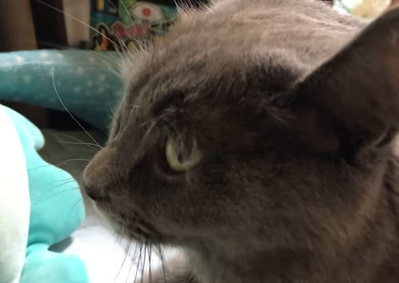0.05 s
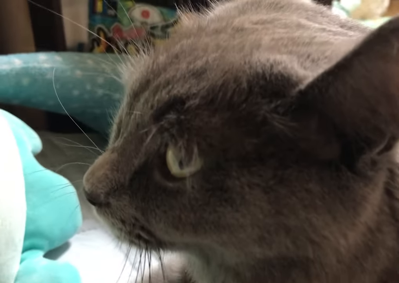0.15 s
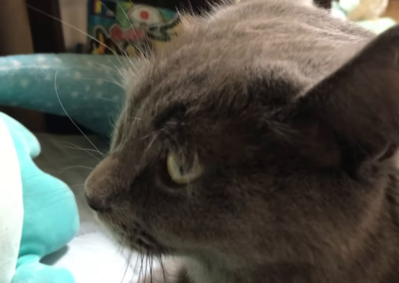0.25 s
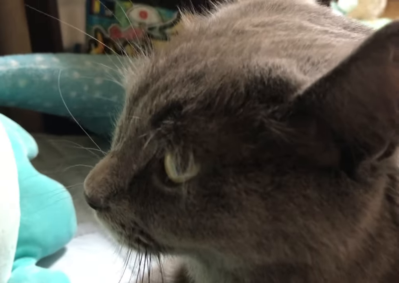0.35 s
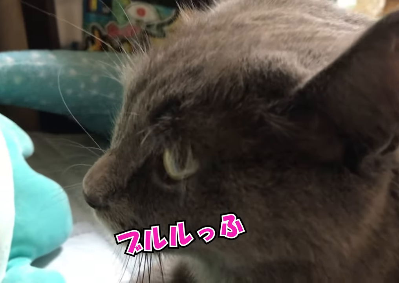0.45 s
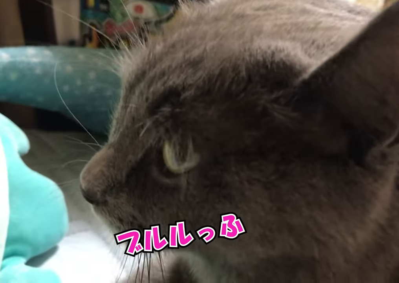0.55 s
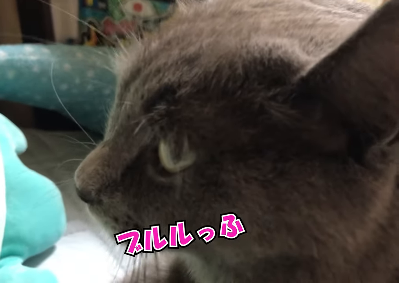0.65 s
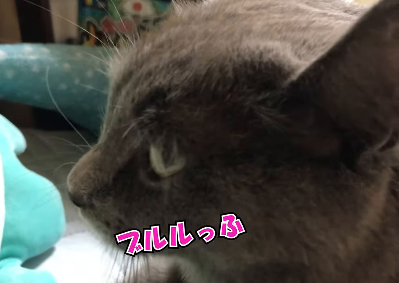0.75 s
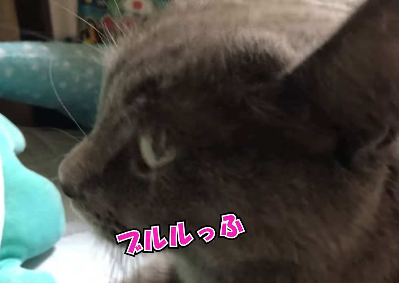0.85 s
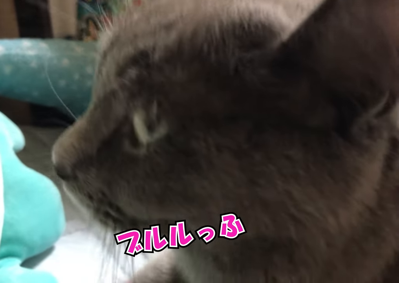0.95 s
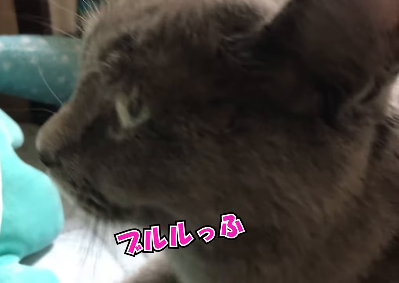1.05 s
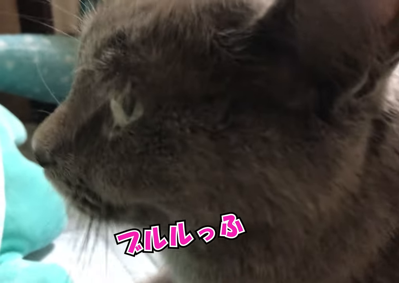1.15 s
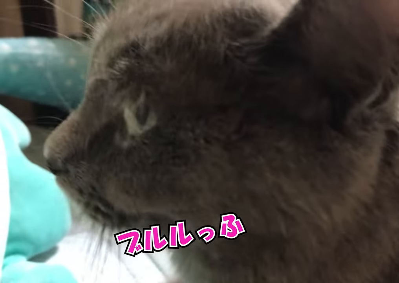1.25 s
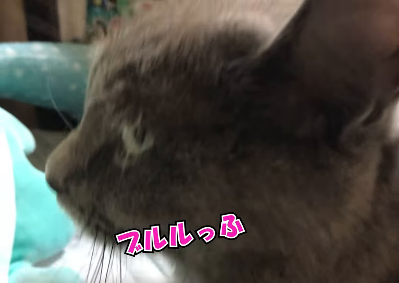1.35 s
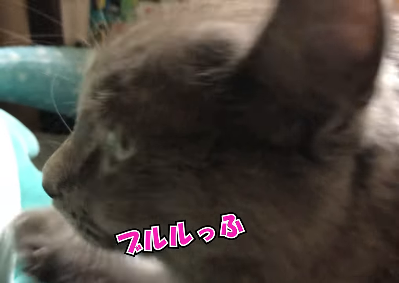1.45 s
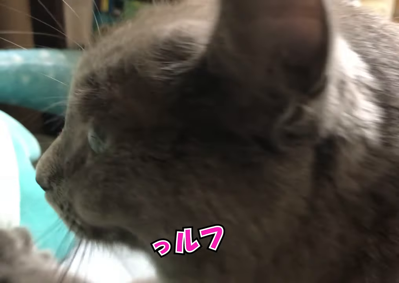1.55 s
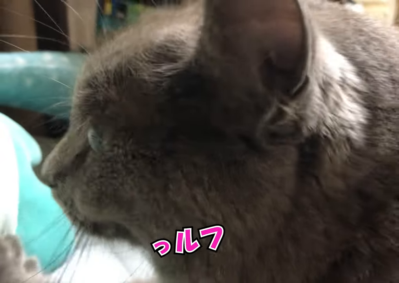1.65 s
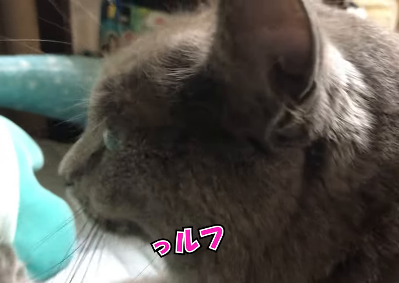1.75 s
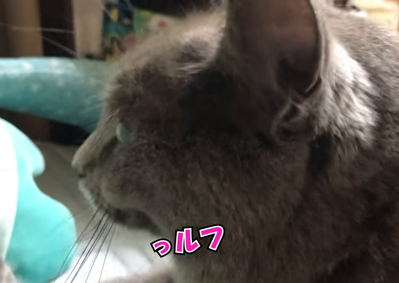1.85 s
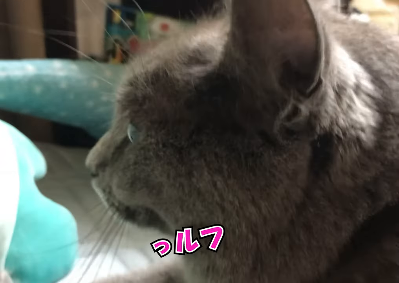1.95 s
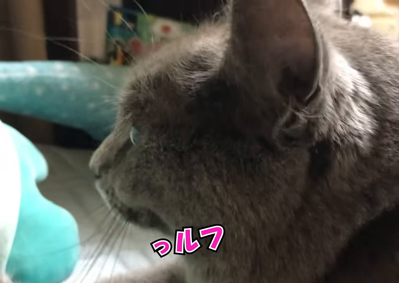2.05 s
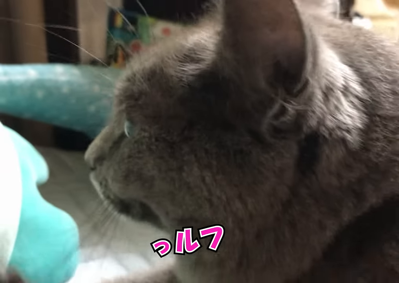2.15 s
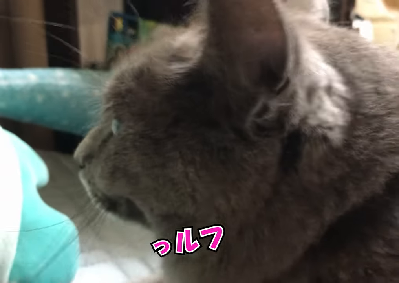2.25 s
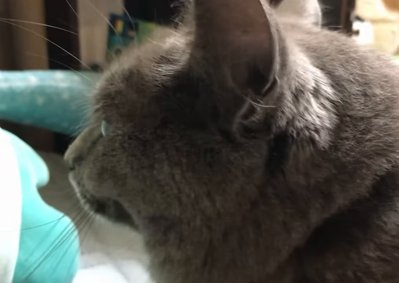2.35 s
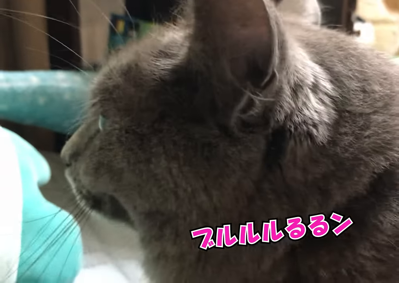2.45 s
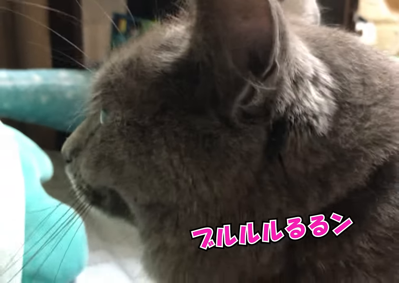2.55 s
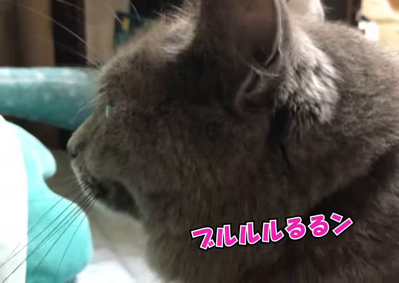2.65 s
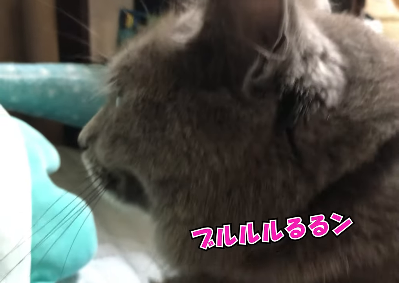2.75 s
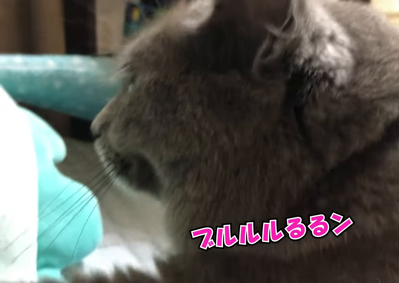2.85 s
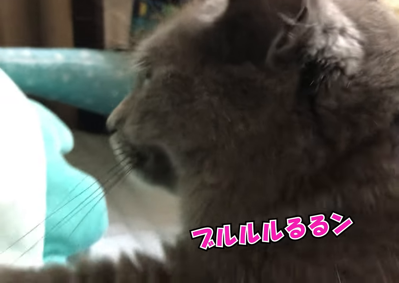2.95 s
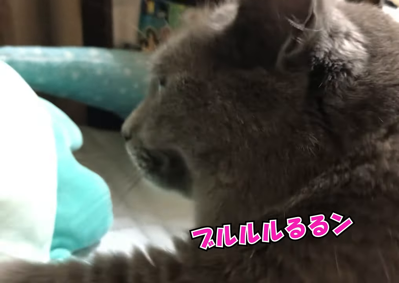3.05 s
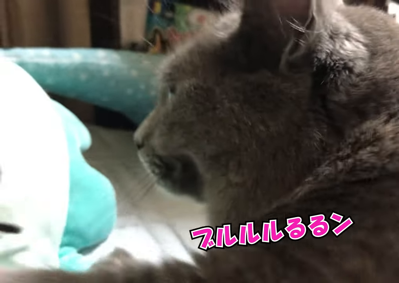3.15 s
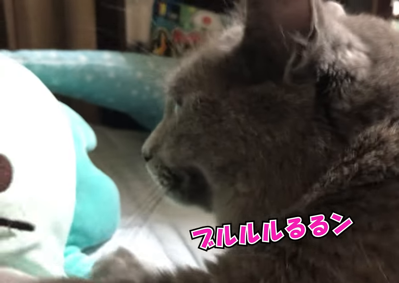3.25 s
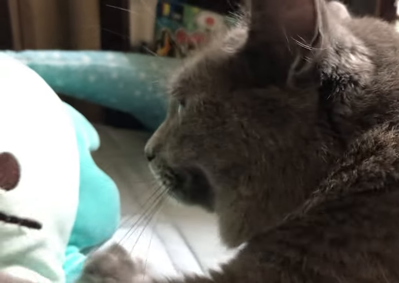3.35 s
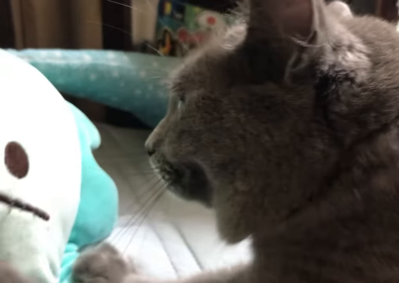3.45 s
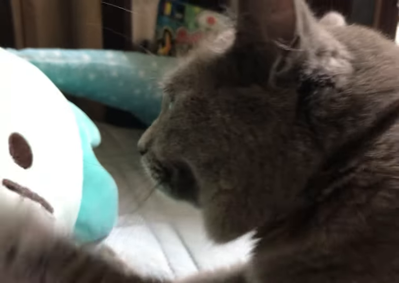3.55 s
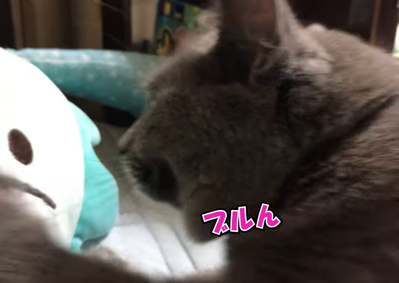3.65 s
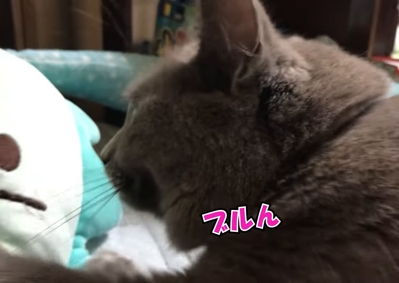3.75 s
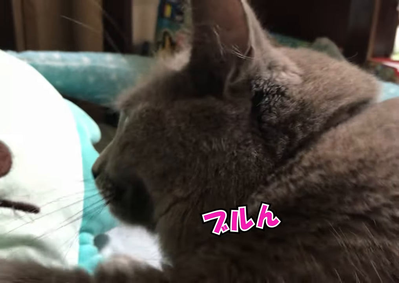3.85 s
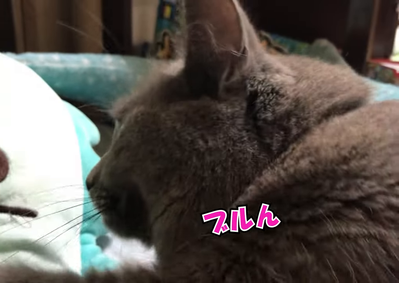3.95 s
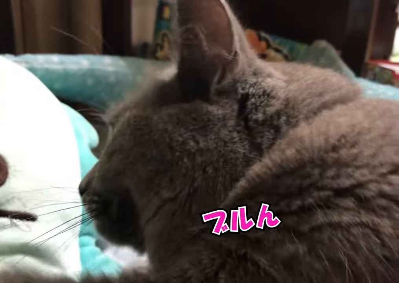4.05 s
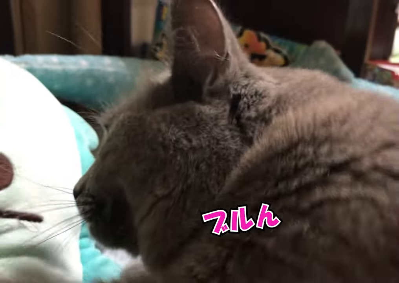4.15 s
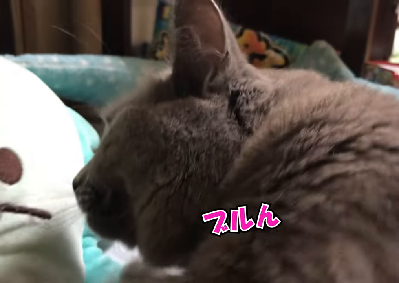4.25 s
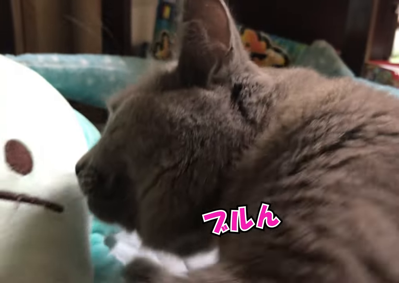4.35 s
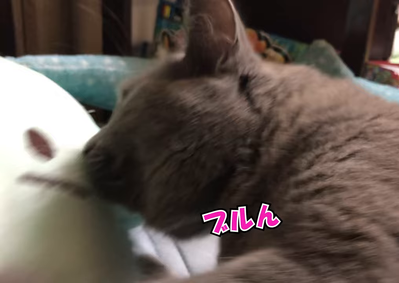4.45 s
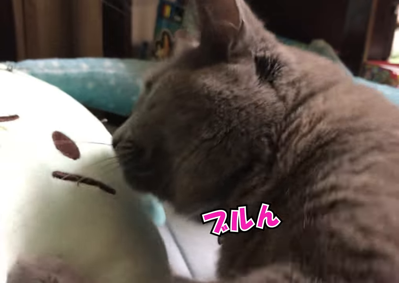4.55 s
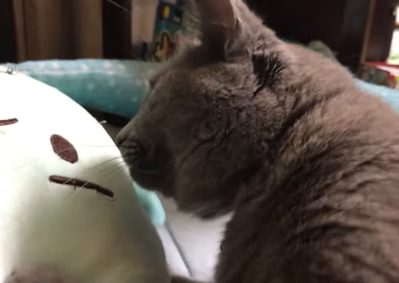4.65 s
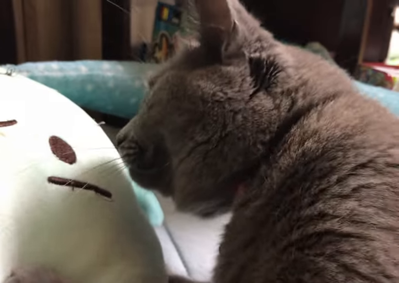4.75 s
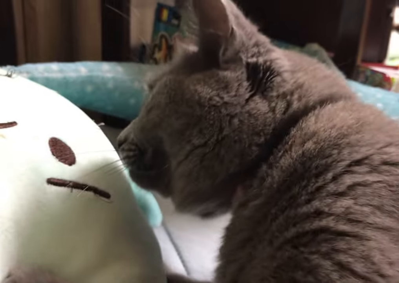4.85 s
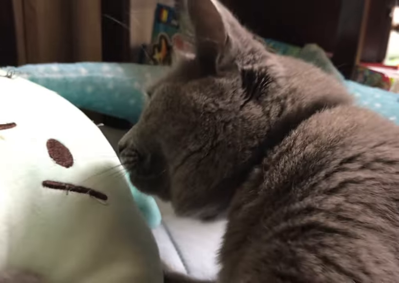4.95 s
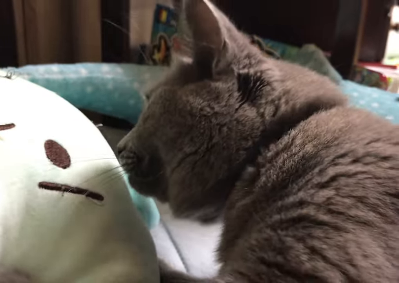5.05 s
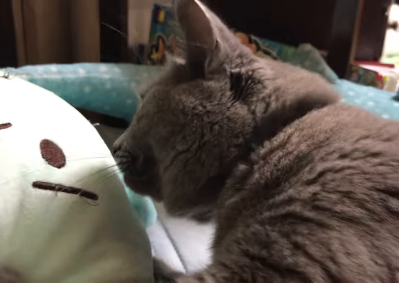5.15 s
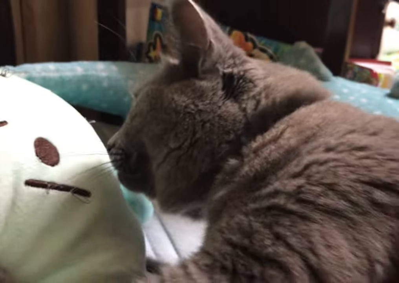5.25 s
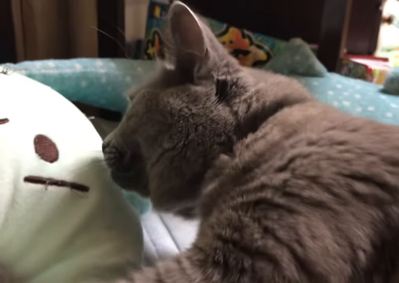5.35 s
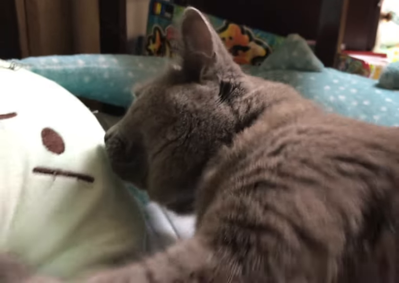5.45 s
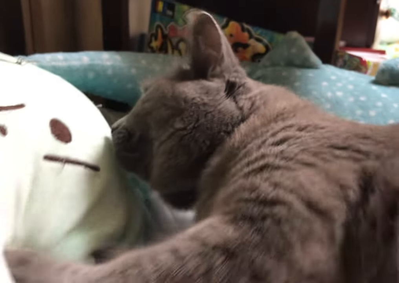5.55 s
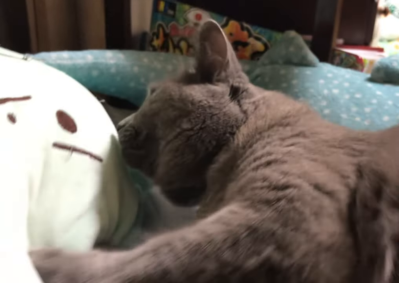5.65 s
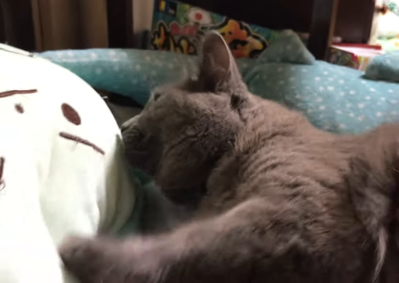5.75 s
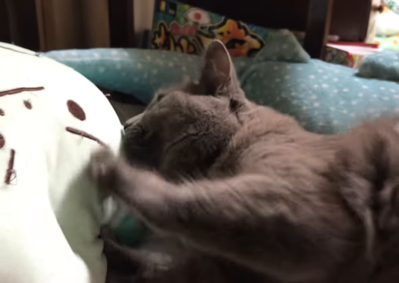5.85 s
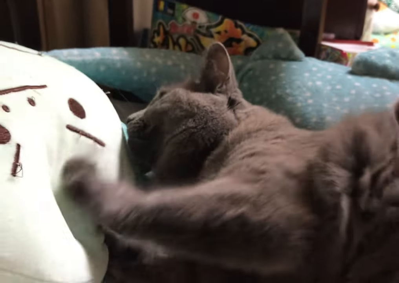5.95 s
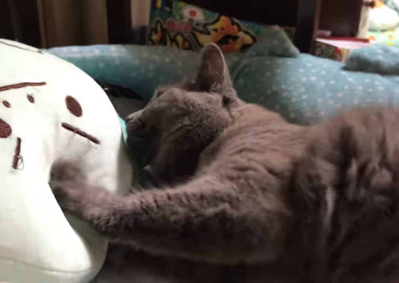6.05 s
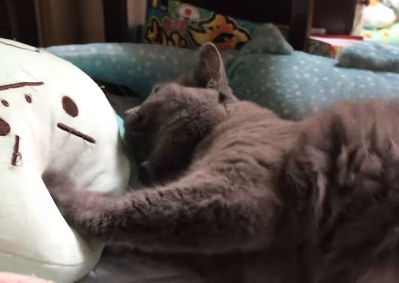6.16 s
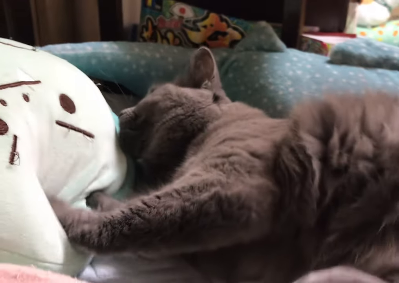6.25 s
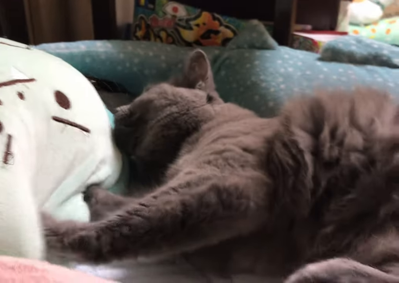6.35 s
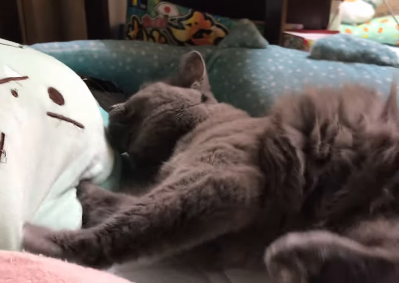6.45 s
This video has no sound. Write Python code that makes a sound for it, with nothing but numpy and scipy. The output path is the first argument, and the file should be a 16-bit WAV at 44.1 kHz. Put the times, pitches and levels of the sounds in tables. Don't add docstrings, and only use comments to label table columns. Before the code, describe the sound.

An intimate, dry indoor close-up of a purring cat: a low rattling flutter with breathy hiss, rising and falling with each breath. A dull paw knock with a claw snap comes first, then loud purring, a crisp metallic tick, several soft bedding thuds and another strong purr. Later breaths are quieter and broken up, background noise suppressed, ending almost silent.

```python
import sys
import numpy as np
from scipy import signal
from scipy.fft import rfft, irfft, next_fast_len
from scipy.io import wavfile
from scipy.ndimage import uniform_filter1d

SR = 44100
rng = np.random.default_rng(int(sys.argv[2]) if len(sys.argv) > 2 else 0)


def level_to_linear(level):
    exponent = np.asarray(level, float) / 20
    return 10 ** exponent


def transcribe(u):
    v = np.clip(np.atleast_2d(u).T, -1, 1)
    q = np.round(v * 32767).astype(np.int16)
    wavfile.write(sys.argv[1], SR, q)


N = 287223

# (frequency [Hz], density [dB per Hz])
ROOM_SPECTRUM = [(12, -34), (30, -8.5), (65, -2.5), (120, -6.5), (200, -6), (300, -14), (400, -19),
                 (650, -19), (885, -22), (1020, -21), (1540, -24.5), (2600, -28), (4580, -29.5),
                 (15600, -35)]
ROOM_DB = -45


def purr():
    # (time [s], pulses so far [count])
    beat = [(0.022, 0), (0.187, 5), (0.543, 15), (1.059, 30), (1.584, 45), (2.464, 70), (2.983, 85),
            (3.321, 95), (3.506, 100), (4.036, 115), (4.394, 125), (4.575, 131), (4.713, 135), (5.056, 145),
            (5.249, 150), (5.431, 155), (6.133, 175), (6.51, 186)]
    # (frequency [Hz], width [Hz], level [dB])
    chest_modes = [(240, 220, 1), (470, 220, -4)]
    throat_modes = [(1005, 330, 3), (1414, 280, -4), (1714, 239, -1.5)]

    t = np.arange(N) / SR
    count = np.interp(t - 0.003, *np.transpose(beat))
    cycle = count.astype(int)
    phase = count % 1
    strength_db, flutter_db = rng.standard_normal((400, 2))[cycle].T
    closes = np.diff(cycle, prepend=cycle[0]) > 0
    claps = evened(closes * level_to_linear(1.5 * strength_db))

    (chest_db, chest_hz, chest_span, throat_db, throat_hz, throat_span,
     nose_db, breath_db, breath_hz, husk) = controls(t)

    swell = 0.18 + np.exp(-(1 - phase) / 0.21) + 0.76 * np.exp(-phase / 0.08)
    air = evened(swell * level_to_linear(1.6 * flutter_db) * rng.standard_normal(N)) * husk

    chest = focus(rings(claps + 0.95 * air, chest_modes), chest_hz, chest_span, skirt_db=13)
    throat = focus(rings(claps + 1.1 * air, throat_modes), throat_hz, throat_span, skirt_db=12)
    nose = evened(resonate(claps + air, hz=2682, width_hz=830))
    hiss = resonate(claps + 3.6 * air, hz=6920, width_hz=4400)
    breath = focus(hiss, breath_hz, np.full(N, 0.22), skirt_db=9)
    breath += 0.9 * evened(resonate(claps + 0.33 * air, hz=10500, width_hz=5000))

    body = level_to_linear(chest_db - 0.83) * chest - level_to_linear(throat_db - 1.57) * throat
    return body + level_to_linear(nose_db - 1.48) * nose + level_to_linear(breath_db - 11.5) * breath


def controls(t):
    # (time [s], effort [dB], mouth: throat against chest [dB], chest ring [Hz])
    breath_1 = [(.41, -56, -34, 305), (.5, -31, -10, 290), (.61, -26.5, -5, 384), (.7, -29.5, -7.5, 309),
                (.8, -30, -9, 283), (.9, -35, -14.5, 276), (.98, -28.5, -14, 345), (1.08, -43.5, -6.5, 225),
                (1.17, -63, 2, 300)]
    breath_2 = [(1.47, -55, -1, 268), (1.58, -48.5, -3, 382), (1.66, -30.5, -6, 382),
                (1.78, -35, -15.5, 440), (1.86, -38.5, -15, 410), (1.93, -41.5, -8.5, 387.8),
                (2.0, -47, -6, 339), (2.1, -51.5, -7.5, 299.5)]
    breath_3 = [(2.46, -68, -14, 335), (2.52, -28.5, -11.5, 310), (2.6, -34, -11, 369.7),
                (2.7, -30.5, -9.5, 310), (2.8, -31, -17, 300), (2.92, -35, -6, 310),
                (3.0, -31.5, -11.5, 305), (3.07, -39.5, -24, 249), (3.19, -51, -14, 248)]
    breath_4 = [(3.6, -52, 1, 303), (3.7, -54.5, -6.5, 400), (3.79, -46.5, -9, 370),
                (3.9, -38.5, -18.5, 335), (3.99, -43.5, -1.5, 350), (4.1, -45, 2, 346),
                (4.19, -38, -7.5, 341.1), (4.29, -46.5, -4, 345), (4.37, -61.5, 0, 330)]
    breath_5 = [(5.21, -62.5, -1, 330), (5.28, -49.5, 4, 384), (5.36, -41, -12.5, 350),
                (5.49, -55, 6.5, 380), (5.6, -44, -2.5, 390), (5.8, -46, 2, 395), (5.9, -49, -1, 434),
                (5.97, -50, 6, 428), (6.07, -54.5, 0, 380)]
    # (chest half spread [octaves], widening [octaves per octave of ring], nose [dB], hiss [dB],
    # air against clap [ratio])
    posture = [(1, 2.8, -49, -52.5, 1.064), (.65, -.3, -57.5, -52, 1.2), (0.82, 0.14, -52.5, -52.5, 1.1),
               (0.38, -1.7, -59.5, -53, 1.484), (0.3383, -.5, -60.5, -50, 1.2)]
    # (start [Hz], end [Hz], half spread at start [octaves], at end [octaves])
    tongue = [(1250, 1190, .36, .33), (1320, 1400, .5, .55), (1260, 1194, 0.56, .2),
              (1340, 1250, 0.77, .75), (1300, 1190, 0.79, .26)]
    # (time [s], half length [s], frequency [Hz])
    pinches = [(1.1, .06, 1358), (1.54, .05, 1078), (1.94, .06, 1711), (3.6, .04, 1711), (5.408, .03, 1078),
               (5.524, .04, 1053)]
    # (time [s], half length [s], extra level [dB], frequency [Hz])
    sniffs = [(.6, 0.11, 5, 6920), (0.713, .03, 5, 5400), (2.587, .05, 5, 5400), (4.195, .03, 7.5, 5400)]
    rest_effort_db, rest_mouth_db, rest_nose_db, rest_hiss_db = -49, -10.5, -55, -60.5
    rest_chest_hz, rest_throat_hz, rest_spread, rest_husk = 255, 1300, 0.46, 0.3
    full_effort_db, full_throat_db = -35, -42

    rows = [np.transpose(b) for b in (breath_1, breath_2, breath_3, breath_4, breath_5)]
    slow = t[::200]

    def contour(rest, column):
        return through(slow, rest, [r[[0, column]] for r in rows])

    def glide(rest, starts, ends):
        curves = [(r[0][[0, -1]], [a, b]) for r, a, b in zip(rows, starts, ends)]
        return through(slow, rest, curves)

    effort_db = contour(rest_effort_db, 1)
    mouth_db = contour(rest_mouth_db, 2)
    chest_hz = contour(rest_chest_hz, 3)
    rests = [rest_spread, 0, rest_nose_db, rest_hiss_db, rest_husk]
    spread, widening, nose_db, hiss_db, husk = (
        glide(rest, held, held) for rest, held in zip(rests, np.transpose(posture)))
    hz_start, hz_end, span_start, span_end = np.transpose(tongue)
    throat_hz = glide(rest_throat_hz, hz_start, hz_end)
    throat_span = glide(rest_spread, span_start, span_end)

    for s, half_s, hz in pinches:
        pinch = bump(slow, s, half_s)
        throat_hz = throat_hz + pinch * (hz - throat_hz)
        throat_span = throat_span + pinch * (0.17 - throat_span)

    breath_db = hiss_db + 0.5 * (effort_db - full_effort_db)
    breath_hz = np.full(len(slow), 5400.0)
    for s, half_s, db, hz in sniffs:
        puff = bump(slow, s, half_s)
        breath_db = breath_db + db * puff
        breath_hz = breath_hz + puff * (hz - breath_hz)

    chest_span = np.maximum(spread + widening * np.log2(chest_hz / 330), 0.2)
    throat_db = effort_db + mouth_db
    nose_db = nose_db + 0.45 * (throat_db - full_throat_db)
    curves = (effort_db, chest_hz, chest_span, throat_db, throat_hz, throat_span,
              nose_db, breath_db, breath_hz, husk)
    return [np.interp(t, slow, curve) for curve in curves]


def through(t, rest, curves):
    turn_s = 0.13
    times = [np.r_[s[0] - turn_s, s, s[-1] + turn_s] for s, _ in curves]
    values = [np.r_[rest, v, rest] for _, v in curves]
    return np.interp(t, np.concatenate(times), np.concatenate(values))


def bump(t, s, half_s):
    return np.exp(-((t - s) / half_s) ** 4)


def rings(x, modes):
    return sum((-1) ** k * level_to_linear(db) * resonate(x, hz, width) for k, (hz, width, db) in enumerate(modes))


def focus(x, centre_hz, spread_octaves, skirt_db):
    hz, t, z = signal.stft(x, SR, nperseg=2048, noverlap=1024)
    at = np.minimum(t * SR, N - 1).astype(int)
    away = np.log2((hz[:, None] + 1) / centre_hz[at]) / np.maximum(spread_octaves, 0.1)[at]
    gain = level_to_linear(-skirt_db * np.tanh(0.5 * away ** 4))
    mean_power = (abs(z) ** 2).mean(1)
    gain /= np.sqrt(mean_power @ gain ** 2 / mean_power.sum())
    return evened(signal.istft(z * gain, SR, nperseg=2048, noverlap=1024)[1][:N])


def paws():
    # (time [s], peak [dB], frequency [Hz], ring [s])
    thuds = [(.185, -13.5, 97.6, 0.066), (0.226, -35, 59.4, .2), (1.055, -38.5, 41.4, 0.3),
             (1.257, -28, 182, 0.072), (1.5, -24, 206.8, 0.085), (1.606, -32.5, 464, 0.062),
             (1.64, -21.5, 427, 0.083), (1.679, -15.5, 247.4, 0.045), (1.832, -38.5, 55, 0.23),
             (1.836, -33, 104.3, .31), (2.5, -28.5, 431, 0.046), (3.748, -33.5, 413.4, 0.075),
             (4.025, -32.5, 406.4, 0.1), (4.247, -23, 113.5, 0.087), (4.25, -39, 54.6, .2),
             (5.088, -36.5, 236.4, 0.1), (5.385, -39, 402, 0.15), (6.34, -43, 34.94, 0.47),
             (6.376, -44.5, 113.1, 0.87), (6.488, -32.5, 40.5, 0.12)]
    # (time [s], peak [dB], frequency [Hz], ring [s], crack against peak [dB])
    catches = [(.18, -11.5, 483, 0.0089, -7), (1.2552, -18.5, 310, 0.011, .5),
               (2.534, -13, 330, 0.029, -20), (2.553, -22, 376, 0.044, -27.5), (3.25, -50.5, 230, .04, 21),
               (3.347, -39.5, 485.5, 0.059, -5), (3.572, -38.5, 312, 0.072, -12),
               (5.243, -42.5, 1564, 0.011, 10), (5.536, -32.5, 1040, 0.034, -27)]
    soft_crack_db = -39

    out = np.zeros(N)
    t = np.arange(SR // 2) / SR
    crack = resonate((t == 0) * 24.0, hz=1300, width_hz=910)
    steps = list(catches) + [(*row, soft_crack_db) for row in thuds]
    for s, db, hz, ring_s, crack_db in sorted(steps):
        onset = 1 - np.exp(-t * hz * 2.75)
        swing = np.sin(2 * np.pi * hz * t) * onset * level_to_linear(7 - 60 * t / ring_s)
        cloth = rng.standard_normal(len(t)) * level_to_linear(-60 * t / 0.29)
        rustle = 0.32 * resonate(cloth, 1650, 870) + 1.23 * resonate(cloth, 360, 300)
        add(out, s, level_to_linear(db) * (swing + level_to_linear(crack_db) * (crack + rustle)))
    return out


def tag():
    # (time [s], peak [dB])
    ticks = [(0.2945, -33.5), (0.3146, -49), (0.9849, -15.5), (1.0029, -7.5), (1.0192, -15.5),
             (1.034, -22.5), (1.589, -19.5), (3.587, -43.5), (3.6067, -41.5)]
    # (frequency [Hz], level [dB], t60 [s])
    tag_modes = [(9080, 0, .02), (9450, -1, .017)]

    out = np.zeros(N)
    t = np.arange(3000) / SR
    ring = np.zeros(len(t))
    for k, (hz, db, t60_s) in enumerate(tag_modes):
        ring += (-1) ** k * level_to_linear(db - 60 * t / t60_s) * np.sin(2 * np.pi * hz * t)
    ring *= 1 - np.exp(-t / 0.00035)
    for s, db in ticks:
        add(out, s, level_to_linear(db + 1.5) * ring / abs(ring).max())
    return out


def room_tone():
    size = next_fast_len(N)
    hz = np.fft.rfftfreq(size, 1 / SR)
    spectrum = rfft(rng.standard_normal(size)) * level_to_linear(read(ROOM_SPECTRUM, hz))
    return level_to_linear(ROOM_DB) * evened(irfft(spectrum, size)[:N])


def resonate(x, hz, width_hz):
    r = np.exp(-np.pi * width_hz / SR)
    pole = r * np.exp(2j * np.pi * hz / SR)
    return 2 * signal.lfilter([(1 - r) ** 2 + 0j], np.poly([pole, pole]), x).real


def evened(x):
    return x / np.sqrt(np.mean(x ** 2) + 1e-20)


def read(points, hz):
    f, value = np.transpose(points)
    return np.interp(np.log(hz + 1), np.log(f + 1), value)


def add(mix, s, sound):
    part = mix[round(s * SR):][:len(sound)]
    part += sound[:len(part)]


def scene():
    return (purr() + paws() + tag() + room_tone())[None]


def denoise(x):
    # (frequency [Hz], margin over the noise print [dB])
    margin = [(110, 10), (170, 12.5), (215, 7.5), (540, 10.5), (680, 10), (850, 9.5), (1070, 6.5),
              (1400, 8.5), (2150, 11), (2700, 8), (4000, 15.5), (5400, 5), (8600, 5), (11000, 18.5)]
    reduce_db, knee_db = 25.5, 1.456
    open_db, close_db = 12.0, 3.999

    hz, _, z = signal.stft(x, SR, nperseg=2048, noverlap=1536)
    third = np.floor(3 * np.log2(np.maximum(hz, 50) / 60))
    band = np.unique(third, return_inverse=True)[1]
    member = band == np.arange(band.max() + 1)[:, None]

    shape = level_to_linear(read(ROOM_SPECTRUM, hz)) ** 2
    room_power = member @ shape / shape.mean() * 3 / 4096
    band_hz = member @ hz / member.sum(1)
    print_db = ROOM_DB + 10 * np.log10(room_power) + read(margin, band_hz)
    level_db = 10 * np.log10(member @ abs(z) ** 2 + 1e-14)
    level_db = uniform_filter1d(level_db, size=3, axis=1, origin=1)
    excess = (level_db - print_db[:, None]) / knee_db
    gain_db = -reduce_db / (1 + np.exp(np.clip(excess, -30, 30)))

    frame = np.arange(z.shape[1])
    gain_db = np.maximum.accumulate(gain_db + 4.001 * frame, axis=1) - close_db * frame
    ahead = (gain_db - open_db * frame)[:, ::-1]
    gain_db = np.maximum.accumulate(ahead, axis=1)[:, ::-1] + open_db * frame
    return signal.istft(z * level_to_linear(gain_db[band]), SR, nperseg=2048, noverlap=1536)[1][:N]


def roll_off(x):
    return signal.sosfilt(signal.butter(12, 16990, fs=SR, output="sos"), x)


def record(dry):
    clean = denoise(dry[0])[None]
    low_pass = signal.firwin(511, 15740, window=("kaiser", 9), fs=SR)
    clean = signal.oaconvolve(clean, low_pass[None], "same")
    return roll_off(clean)


dry = scene()
out = record(dry)
transcribe(out)
```